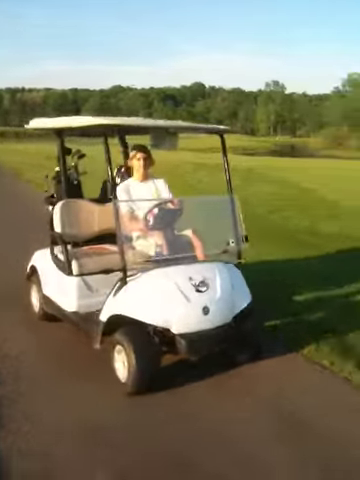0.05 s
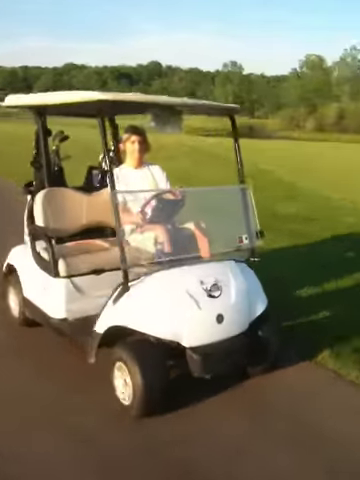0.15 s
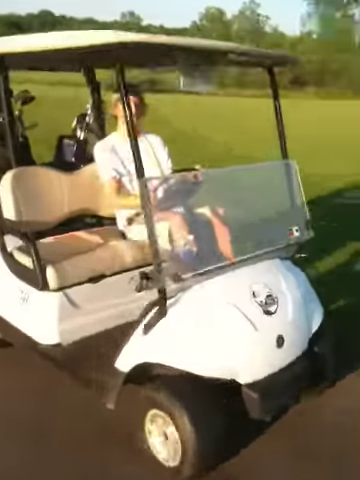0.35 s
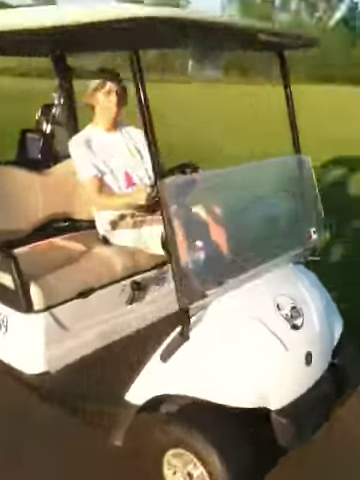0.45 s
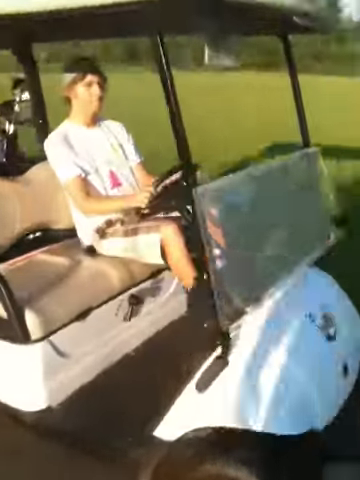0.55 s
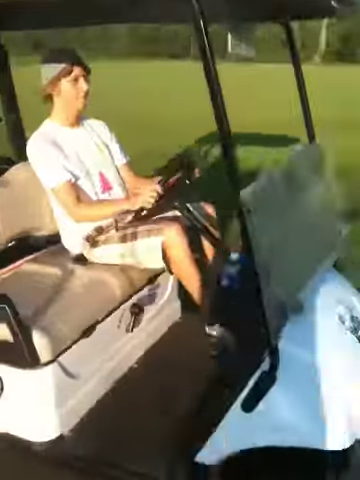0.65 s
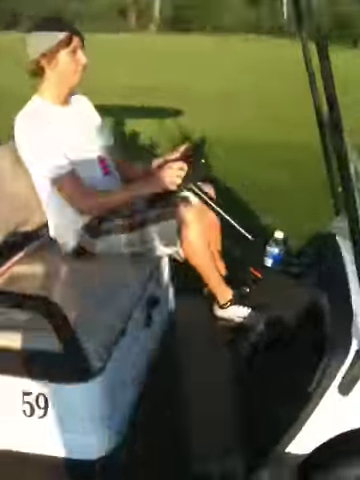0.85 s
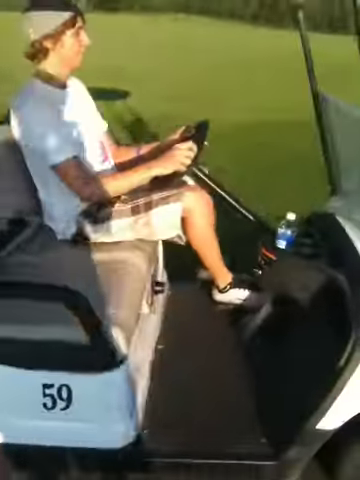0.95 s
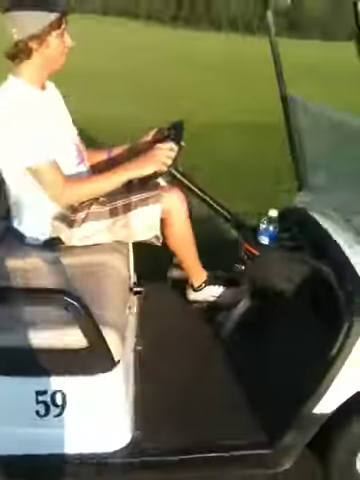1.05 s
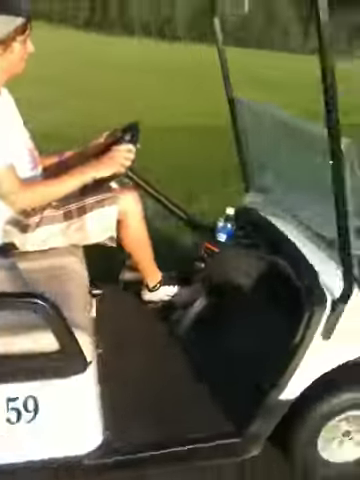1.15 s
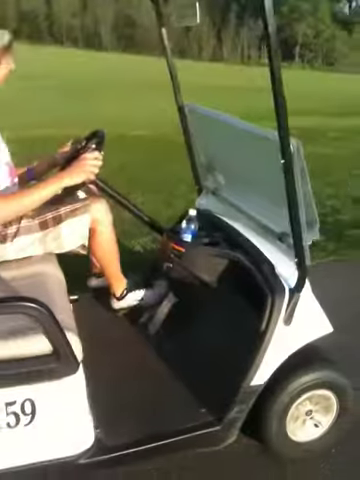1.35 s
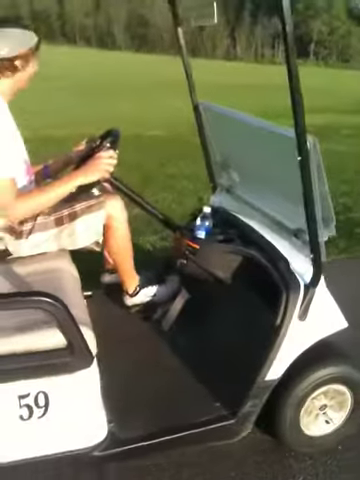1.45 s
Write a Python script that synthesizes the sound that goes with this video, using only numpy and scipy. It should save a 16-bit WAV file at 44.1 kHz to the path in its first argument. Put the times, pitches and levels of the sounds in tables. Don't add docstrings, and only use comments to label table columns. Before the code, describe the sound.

A rough tyre squeal near 1 kHz chirps, warbles and thins out as a rattling cart stops

```python
import sys
import numpy as np
from scipy import signal
from scipy.fft import rfft, irfft, next_fast_len
from scipy.io import wavfile
from scipy.ndimage import uniform_filter1d, map_coordinates

SR = 44100
rng = np.random.default_rng(int(sys.argv[2]) if len(sys.argv) > 2 else 0)


def how_loud(loudness_db):
    steps = np.asarray(loudness_db, float) / 20
    return 10 ** steps


def output_pcm(signal):
    pcm = np.clip(np.atleast_2d(signal).T, -1, 1) * 32767
    wavfile.write(sys.argv[1], SR, np.round(pcm).astype(np.int16))


N = 66150
T = np.arange(N) / SR


def unit(x):
    return x / np.sqrt(np.mean(np.abs(x) ** 2) + 1e-20)


def along(points, hz):
    f, db = np.transpose(points)
    return np.interp(np.log(hz + 1), np.log(f + 1), db, -120, -120)


def curves(rows):
    s, *columns = np.transpose(rows)
    return [np.interp(T, s, column) for column in columns]


def wobble(rate):
    return map_coordinates(rng.standard_normal(3000), [T * rate])


def filtered(x, response):
    m = next_fast_len(N + SR // 4)
    return irfft(rfft(x, m) * response(np.fft.rfftfreq(m, 1 / SR)), m)[:N]


def coloured(x, spectrum):
    return unit(filtered(x, lambda hz: how_loud(along(spectrum, hz))))


def rush(spectrum, patchy_db):
    z = signal.stft(rng.standard_normal(N), nperseg=512)[2]
    field = uniform_filter1d(rng.standard_normal(z.shape), 5, 0)
    field = uniform_filter1d(field, 5, 1)
    x = signal.istft(z * how_loud(patchy_db * unit(field)), nperseg=512)[1][:N]
    return coloured(x, spectrum)


# t/s, level/dB
ROLLING = [
    (0.0, -35),
    (0.96, -37),
    (1.38, -40.5),
    (1.42, -45),
    (1.5, -47),
]
# t/s, level/dB
SCRUBBING = [(0, -47), (.15, -33), (.25, -33), (.4, -31), (.47, -25), (.53, -32), (.75, -33), (1.1, -29.5),
             (1.25, -34), (1.35, -44), (1.5, -42)]
# f/Hz, level/dB per Hz
RUMBLE_SPECTRUM = [(24, -60), (40, -42), (89, -18.5), (227, -10.5), (298, -9), (659, -7.5), (734, -10.5),
                   (1000, -12), (1300, -21), (2200, -120)]
RUBBER_SPECTRUM = [(500, -5.5), (850, -5), (1100, 3.5), (1450, -2.5), (1800, -14.5), (2500, -14),
                   (3200, -36), (5000, -37)]
GRIT_SPECTRUM = [(1470, 0.5), (2600, -3.5), (3000, -9.5), (4400, -7.5), (5500, -9), (9980, -18.5),
                 (15600, -27.5)]
GRIT_DB = -8
STOP_S, STOP_DB = 1.23, -2


def rolling():
    grains = 1 + 1.1 * (rng.random(N) < .01) * rng.exponential(size=N)
    grit = coloured(grains * rng.standard_normal(N), GRIT_SPECTRUM)
    stopped = np.clip(20 * (T - STOP_S), 0, 1)
    grit *= how_loud(GRIT_DB + STOP_DB * stopped + 0.57 * wobble(23))
    rumble = how_loud(1.93 * wobble(25.43)) * rush(RUMBLE_SPECTRUM, patchy_db=1.5)
    roll_db, = curves(ROLLING)
    scrub_db, = curves(SCRUBBING)
    scrub = how_loud(scrub_db + 4.1 * wobble(39.14)) * rush(RUBBER_SPECTRUM, patchy_db=2.0)
    return how_loud(roll_db) * (rumble + grit) + scrub


# t/s, length/s, hiss level/dB, thud level/dB
RATTLES = [(0.096, 0.0083, -38, -52), (0.184, 0.048, -41, -22), (0.194, 0.043, -50, -41),
           (0.304, 0.0083, -44, -36), (0.401, 0.054, -43.5, -26.5), (0.463, 0.022, -36.5, -41),
           (0.597, 0.064, -43.5, -28), (0.645, 0.067, -40.5, -52), (0.695, 0.034, -47, -28),
           (0.736, 0.067, -43.5, -28.5), (0.898, 0.13, -45.5, -38), (1.056, 0.059, -45.5, -35.5),
           (1.109, 0.037, -45, -39), (1.136, 0.052, -42.5, -34), (1.225, 0.02, -45, -33.5),
           (1.267, 0.025, -47, -33), (1.453, 0.052, -48.5, -56)]
# f/Hz, level/dB per Hz
TIN_SPECTRUM = [(1500, -23), (3000, -11.5), (5500, -5.5), (8000, -16), (12000, -15.5), (15700, -41)]
# f/Hz, width/Hz, level/dB
PANELS = [
    (320, 90, -3),
    (580, 80, 1),
    (900, 150, -8),
    (1320, 200, -7),
]


def panels(f):
    total = 0
    for k, (centre, width, db) in enumerate(PANELS):
        resonance = 1j * f * width / (centre * centre - f * f + 1j * f * width)
        total = total + (-1) ** k * how_loud(db) * resonance
    return total


def rattles():
    hiss, thud = np.zeros(N), np.zeros(N)
    for s, length, hiss_db, thud_db in RATTLES:
        u = np.maximum(T - s, 0) / length
        shape = (1 - np.exp(-u * 9)) * np.exp(-u ** 2)
        hiss += how_loud(hiss_db) * shape
        thud += how_loud(thud_db) * shape
    chatter = how_loud(0.57 * wobble(200))
    ring = filtered(thud * chatter * rng.standard_normal(N), panels) * how_loud(17)
    return ring + hiss * chatter * rush(TIN_SPECTRUM, patchy_db=-6.5)


# t/s, delay/ms, share of the direct sound
ROAD = [
    (0, 0.77, 1),
    (.42, 0.67, 0.69),
    (.55, 0.11, 0.049),
    (1.5, 0.46, 0.51),
]
ROAD_TOP_HZ = 1274


def road_bounce(noise):
    delay_ms, share = curves(ROAD)
    late = np.interp(T - delay_ms / 1000, T, noise)
    return share * filtered(late, lambda f: 1 / (1 + (f / ROAD_TOP_HZ) ** 6))


# t/s, level/dB, f/Hz, t60/s
KNOCKS = [
    (.192, -22, 292, .04),
    (0.2, -20.5, 1354, 0.051),
    (.212, -17, 570, 0.063),
    (0.214, -35, 335, 0.064),
    (.241, -31, 388, 0.036),
    (.282, -21, 413, 0.06),
    (.316, -20, 424, 0.049),
    (1.073, -23.5, 552, 0.16),
    (1.388, -32, 453, .08),
]
# t/s, level/dB
TICKS = [(0.101, -35), (0.1907, -33), (0.2275, -29.5), (0.6582, -36), (0.7069, -28), (0.717, -28),
         (0.7413, -37), (0.925, -33), (1.0615, -34.5), (1.119, -38)]
KNOCK_RISE_S, TICK_T60_S = 0.0012, 0.0063


def knocks():
    ring, bright = np.zeros(N), np.zeros(N)
    for s, db, hz, t60 in KNOCKS:
        t = np.maximum(T - s, 0)
        ring += how_loud(db - 60 * t / t60) * (1 - np.exp(-t / KNOCK_RISE_S)) * np.sin(2 * np.pi * hz * t)
    for s, db in TICKS:
        bright += how_loud(db - 60 * np.maximum(T - s, 0) / TICK_T60_S) * (T >= s)
    return ring + bright * rush(TIN_SPECTRUM, patchy_db=-1.0)


def hold(rows):
    u = (T[None] - rows[:, :1]) / rows[:, 1:2] + 0.096
    return how_loud(rows[:, 2:3]) * np.exp(-np.where(u < 0, 2.8, 1.6) * u ** 2)


# t/s, length/s, level/dB, f/Hz
CHIRP = [
    (0.4687, 0.0065, -15, 1006),
    (0.475, 0.0032, -17.5, 953),
    (0.4821, 0.0041, -11, 934),
    (0.491, 0.0056, -19, 1000),
]
# multiple of its pitch, level/dB
BITE = [(1, -0.5), (1.3, -1.5), (2, 2), (2.15, -4), (2.9, -9.5), (4, -22.5), (5, -26)]
BITE_GRIT_DB = 4


def chirp():
    rows, (k, db) = np.array(CHIRP), np.transpose(BITE)
    phase = rng.random((len(rows), len(k), 1))
    hz = rows[:, 3, None, None] * k[:, None]
    notes = how_loud(db)[:, None] * np.sin(2 * np.pi * (hz * T + phase))
    bursts = (hold(rows) * notes.sum(axis=1)).sum(axis=0)
    return bursts * how_loud(BITE_GRIT_DB * wobble(900))


GRIP_DB = -2


def gripped(level, hz, rows):
    rows = np.array(rows)
    power = (how_loud(GRIP_DB) * hold(rows)) ** 2
    total = level ** 2 + power.sum(axis=0)
    return np.sqrt(total), (level ** 2 * hz + rows[:, 3] @ power) / total


def blur(rate):
    return unit(wobble(rate) + 1j * wobble(rate))


SMEAR_HZ = 74.83
SKIRT_HZ, SKIRT_DB = 291.2, -7


def partial(k, hz, rough):
    share = 1 - (1 - rough) ** k ** .5
    smear = blur(2 * SMEAR_HZ * k ** .5) + how_loud(SKIRT_DB) * blur(2 * SKIRT_HZ)
    shimmer = np.sqrt(1 - share) + np.sqrt(share) * smear
    return np.sqrt(2) * np.real(shimmer * np.exp(2j * np.pi * np.cumsum(hz) / SR))


# t/s, f/Hz, level/dB, octave over it/dB, roughness 0-1
SLIDE = [(.27, 1120, -58, -23, 0.23), (.29, 1120, -33, -40, 0.42), (.44, 1134, -31, -33, 0.53),
         (.468, 1002, -20.5, -8, 1.3), (.495, 1011, -32, -2, 0.53), (.515, 1160, -29, -5.5, 0.3),
         (.6, 1052, -33, 0, 0.63), (.69, 1027, -17, -6.5, 0.75), (.75, 1038, -28, -2.5, 0.6),
         (.8, 1060, -15, -17, 0.3), (.86, 1079, -30.5, -1, 0.56), (.97, 1040, -33.5, -4, 0.91),
         (1.1, 1115, -31.5, -11.5, 0.61), (1.16, 1094, -34.5, -21.5, 0.49), (1.25, 1093, -38, -13.5, 0.52),
         (1.3, 1123, -27.5, -29, 0.25), (1.38, 1098, -36.5, -30, 0.01), (1.4, 1150, -55, 1, 0.2)]
# t/s, length/s, level/dB, f/Hz
FIRST_GRIPS = [
    (0.295, 0.011, -28.5, 1135),
    (0.343, 0.019, -23.5, 1128),
    (.46, .012, -19, 1055),
]
GRIPS = [(0.511, 0.0108, -22.0, 1154.0), (0.538, 0.0246, -18.0, 1117.0), (0.553, 0.0056, -17.0, 1104.0),
         (0.564, 0.006, -23.0, 1120.0), (0.572, 0.005, -18.0, 1065.0), (0.595, 0.0187, -14.0, 1034.0),
         (0.614, 0.004, -23.0, 1107.0), (0.626, 0.0116, -14.0, 1070.0), (0.644, 0.0124, -9.0, 1043.0),
         (0.66, 0.0076, -5.0, 1026.0), (0.675, 0.0113, -8, 1020), (0.69, 0.0247, -11, 1018),
         (0.7085, 0.0095, -5, 1005), (0.726, 0.0056, -8.0, 1046.0), (0.735, 0.004, -20.0, 1109.0),
         (0.75, 0.03, -21.0, 1052.0), (0.778, 0.0173, -8.0, 1042.0), (0.791, 0.0146, -11.0, 1069.0),
         (0.81, 0.0135, -9.0, 1072.0), (0.83, 0.0104, -10.0, 1079.0), (0.84, 0.0041, -11.0, 1073.0),
         (0.849, 0.0077, -16.0, 1070.0), (0.865, 0.008, -20.0, 1053.0), (0.887, 0.0186, -14.0, 1005.0),
         (0.899, 0.004, -19.0, 1030.0), (0.905, 0.0051, -16.0, 1077.0), (0.921, 0.0121, -11.0, 1057.0),
         (0.94, 0.0066, -18.0, 1031.0), (0.961, 0.0123, -19.0, 1051.0), (0.976, 0.008, -20.0, 1053.0),
         (0.987, 0.004, -19.0, 1074.0), (1.001, 0.0104, -19.0, 1125.0), (1.016, 0.0115, -9.0, 1043.0),
         (1.034, 0.0062, -18.0, 1092.0), (1.051, 0.0141, -17.0, 1122.0), (1.078, 0.0159, -15.0, 1073.0),
         (1.099, 0.0074, -19.0, 1093.0), (1.119, 0.0237, -22.0, 1070.0), (1.139, 0.0134, -20.0, 1069.0),
         (1.151, 0.004, -22.0, 1118.0), (1.177, 0.0259, -19.0, 1108.0), (1.203, 0.0147, -17.0, 1103.0),
         (1.234, 0.006, -18, 1102), (1.243, 0.011, -20, 1106), (1.275, 0.011, -21, 1117),
         (1.29, 0.018, -25, 1111)]
# t/s, length/s, level/dB, f/Hz
OCTAVE_GRIPS = [(0.539, 0.0077, -20, 2249), (0.552, 0.0121, -19, 2196), (0.562, 0.0052, -20, 2181),
                (0.585, 0.0194, -16, 2111), (0.607, 0.0153, -15, 2099), (0.619, 0.0061, -15, 2138),
                (0.637, 0.0178, -16, 2123), (0.656, 0.0119, -15, 2061), (0.674, 0.0072, -16, 2025),
                (0.695, 0.0157, -15, 2069), (0.707, 0.004, -13, 2030), (0.719, 0.0088, -9, 2032),
                (0.733, 0.0168, -11, 2052), (0.756, 0.0043, -15, 2078), (0.771, 0.03, -21, 2117),
                (0.782, 0.0042, -17, 2136), (0.795, 0.004, -23, 2189), (0.805, 0.0072, -17, 2145),
                (0.823, 0.0175, -17, 2131), (0.843, 0.004, -19, 2176), (0.849, 0.004, -23, 2270),
                (0.862, 0.03, -24, 2192), (0.892, 0.0088, -21, 2034), (0.905, 0.0055, -22, 2095),
                (0.914, 0.0054, -17, 2121), (0.925, 0.0062, -17, 2127), (0.936, 0.0053, -25, 2163),
                (0.952, 0.0153, -22, 2063), (0.965, 0.0041, -23, 2086), (0.978, 0.0084, -23, 2096),
                (0.997, 0.019, -30, 2053), (1.027, 0.0202, -27, 2107), (1.064, 0.0229, -29, 2111),
                (1.092, 0.03, -28, 2196), (1.135, 0.03, -36, 2116), (1.198, 0.0238, -33, 2182),
                (1.236, 0.03, -37, 2157), (1.281, 0.0151, -42, 2219)]
# multiple of the pitch, level over the octave/dB
OVERTONES = [
    (3, -15),
    (4, -22),
    (5, -23.5),
]
DRIFT_HZ = 14.4
ROUGH_SCALE, OCTAVE_ROUGH = .06, .25
UPPER_FOLLOWS = .4
THIRD_DB = -27
OTHER_TYRE, OTHER_WANDER, OTHER_DB = 1.08, .03, -17


def squeal():
    hz, db, octave_db, rough = curves(SLIDE)
    hz = hz + DRIFT_HZ * rough * wobble(69.83)
    rough = np.clip(rough, 0, 1)
    octave = how_loud(db + octave_db)
    low, low_hz = gripped(how_loud(db), hz, list(FIRST_GRIPS) + list(GRIPS))
    top, top_hz = gripped(octave, 2 * hz, OCTAVE_GRIPS)
    out = low * partial(0.93, low_hz, ROUGH_SCALE * rough)
    out += top * partial(2, top_hz, OCTAVE_ROUGH * rough)
    upper = top ** UPPER_FOLLOWS * octave ** (1 - UPPER_FOLLOWS)
    for k, k_db in OVERTONES:
        out += upper * how_loud(k_db) * partial(k, round(k) * top_hz / 2, rough)
    out += how_loud(THIRD_DB) * rough * low * partial(2.3, 3 * low_hz, rough)

    other_hz = hz * (OTHER_TYRE + OTHER_WANDER * wobble(14))
    other = low * partial(1.0, other_hz, rough) + top * partial(1.8, 2 * other_hz, rough)
    out += how_loud(OTHER_DB + 0.72 * wobble(26.0)) * 2 * rough * other
    return out * (T > SLIDE[0][0]) * (T < SLIDE[-1][0])


def scene():
    noise = rolling() + rattles()
    return (noise + road_bounce(noise) + knocks() + chirp() + squeal())[None]


def band_limit(x):
    return signal.sosfilt(signal.butter(12, 15700, fs=SR, output="sos"), x)


def record(dry):
    low_hz, top_hz = 95, 15700
    clip_top, clip_hard = .73, 8

    def thin(f):
        return 1j * f / (low_hz + 1j * f)

    x = filtered(dry[0], lambda f: thin(f) ** 2)
    x = x / (1 + np.abs(x / clip_top) ** clip_hard) ** (1 / clip_hard)
    mix = filtered(x, lambda f: thin(f) * (f < top_hz))[None]
    return band_limit(mix)


dry = scene()
out = record(dry)
output_pcm(out)
```